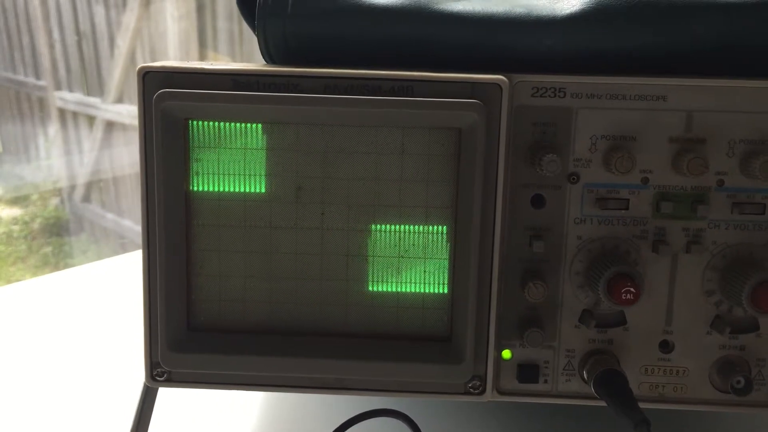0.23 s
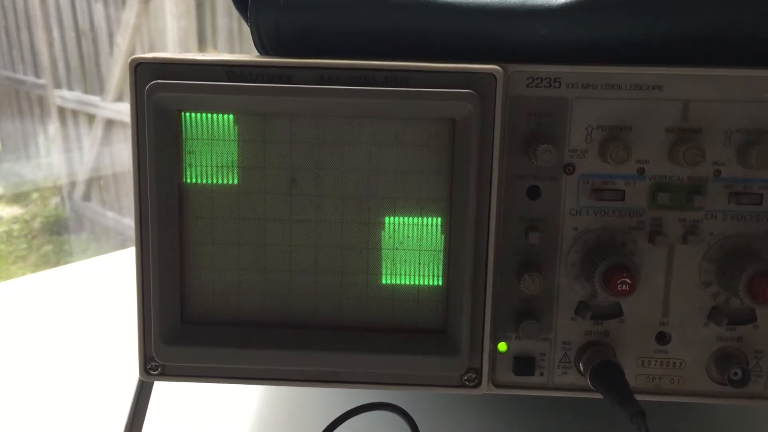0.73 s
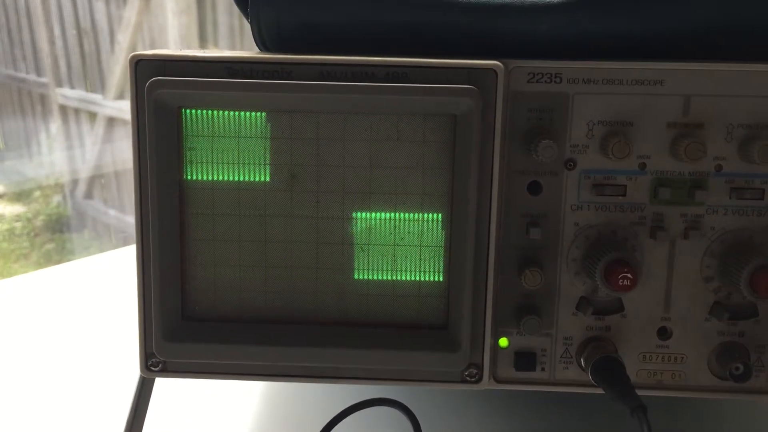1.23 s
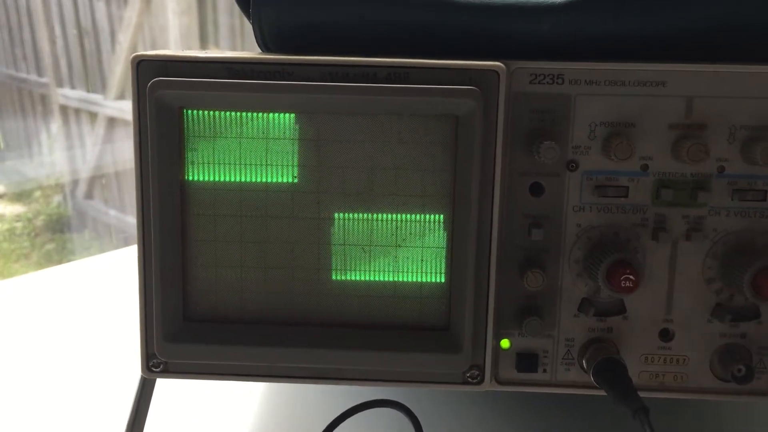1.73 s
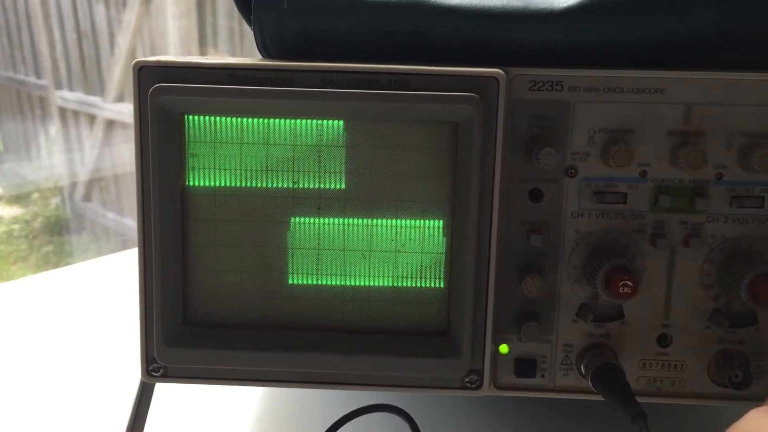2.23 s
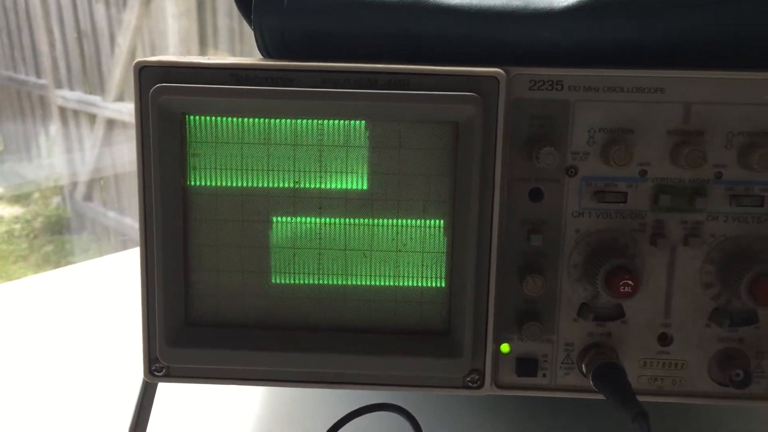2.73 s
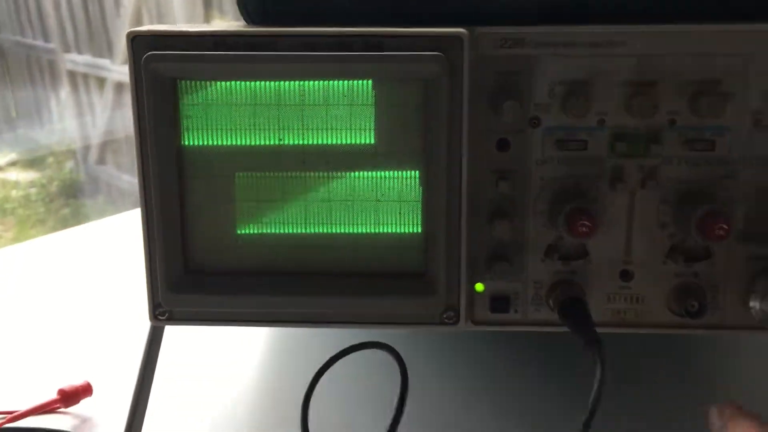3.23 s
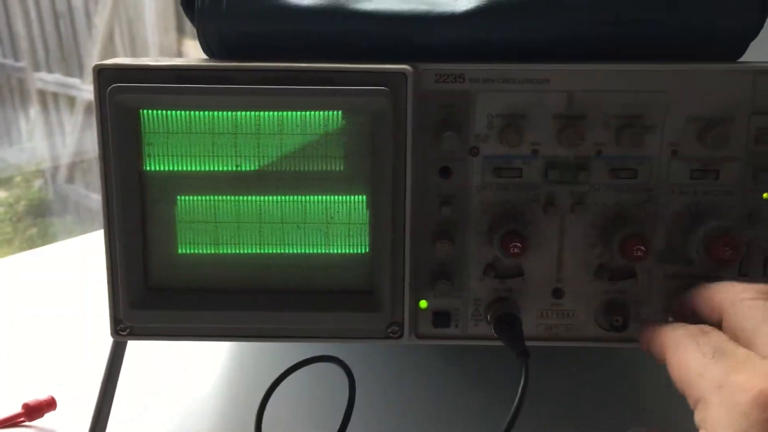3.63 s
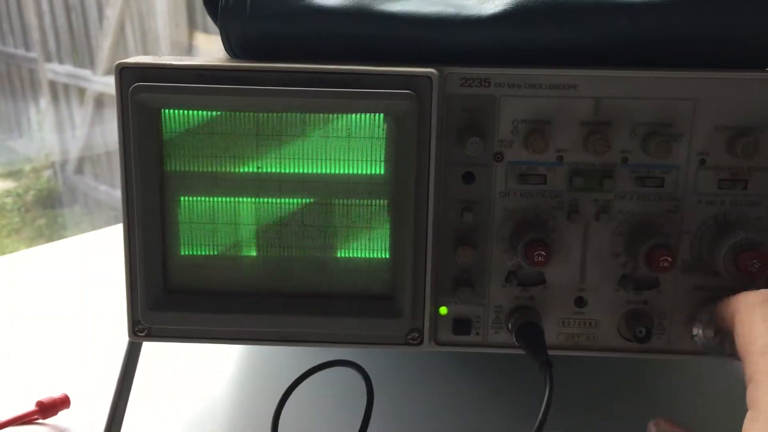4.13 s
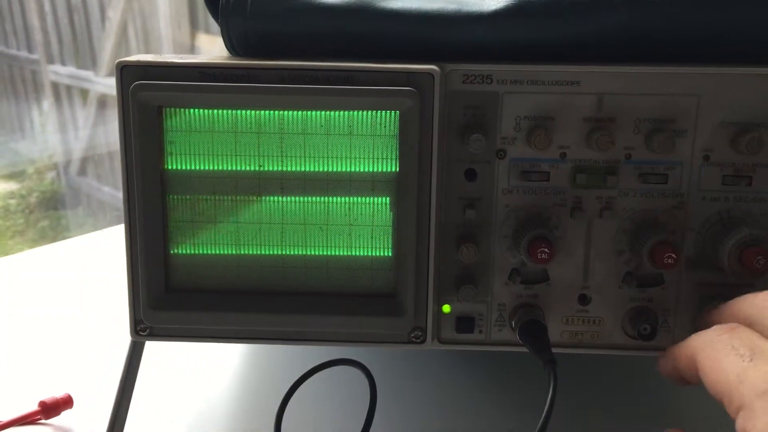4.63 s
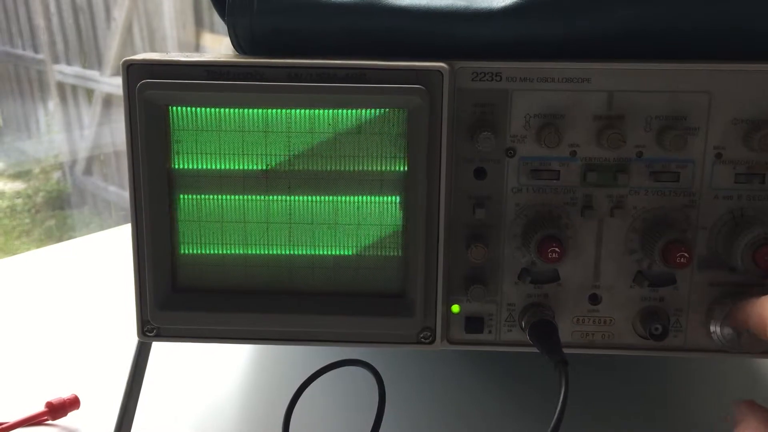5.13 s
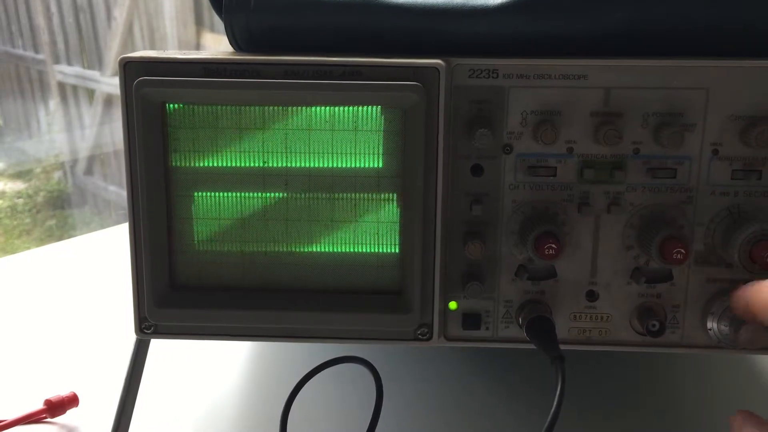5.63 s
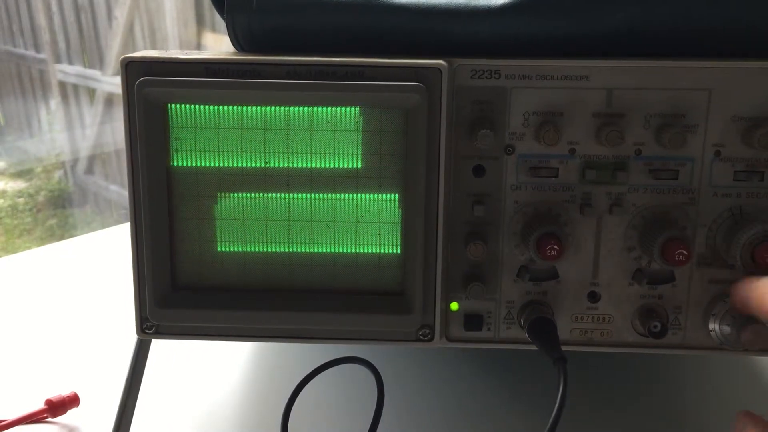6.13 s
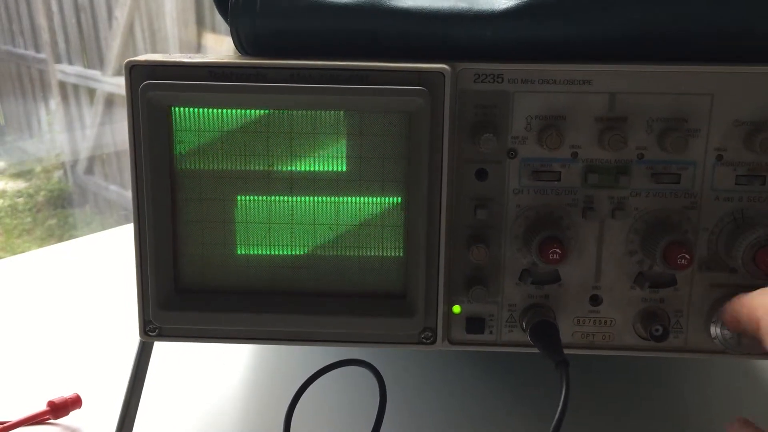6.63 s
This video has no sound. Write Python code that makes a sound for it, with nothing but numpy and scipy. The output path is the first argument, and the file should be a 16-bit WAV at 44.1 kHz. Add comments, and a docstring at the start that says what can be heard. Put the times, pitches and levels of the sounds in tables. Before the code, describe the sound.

In a quiet room with a faint, wavering low hum, the rotary switches of a bench instrument are clicked round close by. The sharp, slightly metallic clicks come in quick irregular groups, with light finger friction and faint shaft squeaks. Soft rustling swells and fades a little further away around the middle, then more clicks follow, along with a couple of soft knocks on the case.

```python
"""A low wavering hum and the floor of a quiet room; close by, a bench instrument's knobs click round.
Each step is a short chatter of the detent spring that rings the metal panel; fingers rub the knob
between steps. A small metal part pings on some clicks and the shaft squeaks faintly.
Later a duller rustle comes in strokes from further off; near the end a knuckle knocks the case."""
import sys
import numpy as np
from scipy import signal
from scipy.io import wavfile
from scipy.ndimage import uniform_filter1d

SR = 44100
rng = np.random.default_rng(int(sys.argv[2]) if len(sys.argv) > 2 else 0)


def wav_out(sig):
    """Save sig, one row per channel (or a flat mono array), as 16-bit PCM at SR to the path in sys.argv[1]."""
    wavfile.write(sys.argv[1], SR, np.round(np.clip(np.atleast_2d(sig).T, -1, 1) * 32767).astype(np.int16))


N = 303315


def gain_of(db):
    """Decibels to amplitude."""
    return 10 ** (np.asarray(db) / 20)


def unit_rms(x):
    """Scales to rms 1."""
    return x / np.sqrt(np.mean(x ** 2) + 1e-20)


def value_at(points, hz):
    """Interpolates (Hz, value) rows on a log-frequency axis."""
    points_hz, values = np.transpose(points)
    return np.interp(np.log(hz + 1), np.log(points_hz + 1), values)


def resonate(x, hz, width_hz):
    """One resonance; a low-pass at 0 Hz."""
    r = np.exp(-np.pi * width_hz / SR)
    return 2 * signal.lfilter([1 - r], [1, -r * np.exp(2j * np.pi * hz / SR)], x).real


def narrow_noise(hz, width_hz):
    """Noise through the same resonance twice, rms 1."""
    return unit_rms(resonate(resonate(rng.standard_normal(N), hz, width_hz), hz, width_hz))


def minimum_phase(points, size=2048):
    """Taps of a (Hz, dB) spectrum, energy 1."""
    db = np.maximum(value_at(points, abs(np.fft.fftfreq(size, 1 / SR))), -100)
    spectrum = np.exp(np.conj(signal.hilbert(np.log(gain_of(db)))))
    taps = np.fft.ifft(spectrum).real[:size // 2]
    return taps / np.linalg.norm(taps)


def patchy_noise(points, patch_db, size, tilt_db_per_oct=0):
    """Noise of a (Hz, dB) spectrum with drifting louder and softer patches, rms 1."""
    hop, hz = size // 4, np.fft.rfftfreq(size, 1 / SR)[:, None]
    real, imag, patches = rng.standard_normal((N // hop + 5, len(hz), 3)).T
    patches = unit_rms(uniform_filter1d(uniform_filter1d(patches, size=6, axis=0), size=8, axis=1))
    db = value_at(points, hz) + tilt_db_per_oct * np.log2((hz + 50) / 1500) + patch_db * patches
    spectra = (real + 1j * imag) * gain_of(db)
    return unit_rms(signal.istft(spectra, nperseg=size, noverlap=size - hop)[1][:N])


def grit(spread_db, hold_samples):
    """Uneven friction: a random gain for each brief slip, rms 1."""
    slips_db = spread_db * np.minimum(rng.exponential(1, N // hold_samples + 1), 5)
    return unit_rms(gain_of(slips_db).repeat(hold_samples))[:N]


def hum():
    """A wavering low tone and two fuzzier lines above it."""
    # Each row: time in seconds, level of the low tone in dB.
    tone_levels = [(0.0, -58), (0.11, -53), (0.25, -74), (0.32, -58), (1.09, -51.5), (2.14, -48.5),
                   (2.79, -55.5), (2.85, -64), (4.3, -54.5), (4.38, -62.5), (4.53, -49.5), (4.61, -55),
                   (4.78, -49.5), (4.88, -65), (5.01, -49), (5.2, -68), (5.24, -57.5), (5.64, -65),
                   (5.8, -54), (5.87, -66), (6.35, -56.5), (6.87, -53)]
    # Each row: pitch in Hz, width in Hz, level in dB.
    upper_lines = [(123.9, 10.9, -64.5), (145.3, 8.7, -60)]
    tone_hz, drift_hz, waver_db = 59.2, 0.74, 2
    t = np.arange(N) / SR
    drift = unit_rms(resonate(rng.standard_normal(N), 0, width_hz=6.2))
    tone = np.sqrt(2) * np.sin(2 * np.pi * np.cumsum(tone_hz + drift_hz * drift) / SR)
    waver = narrow_noise(0, width_hz=4.3)
    out = tone * gain_of(np.interp(t, *np.transpose(tone_levels)) + waver_db * waver)
    for hz, width_hz, db in upper_lines:
        out += gain_of(db) * unit_rms(narrow_noise(hz, width_hz) + 4.3 * np.sin(2 * np.pi * hz * t))
    return out


def noise_floor():
    """Rumble and faint hiss of the room and the microphone."""
    # Each row: frequency in Hz, relative density in dB.
    spectrum = [(15, -31.5), (25, -20), (40, -18.5), (59, -5), (102, -8), (149, -8), (223, -13.5),
                (293, -14.5), (463, -34.5), (695, -30), (988, -39.5), (1370, -36.5), (4870, -44.5),
                (12500, -51), (14800, -52.5), (16000, -79)]
    return gain_of(-57) * patchy_noise(spectrum, patch_db=1.6, size=2048)


def detent_force(grips):
    """Dying chatter of the spring at each step, as envelopes by grip and band."""
    # Each row: start in seconds, drive in dB, thud and snap offsets in dB, chatter t60 in seconds.
    clicks = [(0.1299, -38.5, -13, 3.5, .049), (0.144, -35, -3, -1, .018), (0.157, -25, -2.5, -0.5, .036),
              (0.174, -26, 4.5, -3, .03), (.1864, -18.5, -0.5, 6.5, .025), (0.1946, -25, 8, -2, .018),
              (0.275, -27, -25.5, 3, .017), (0.2992, -32.5, -1, 2.5, .028), (0.5286, -40, -3, 5, .041),
              (.58, -15.5, 1.5, 6, .023), (0.5913, -12.5, 0, 0.5, .014), (.602, -9.5, 3, 1.5, .021),
              (0.6586, -31, -7, 2.5, .022), (1.121, -21.5, -2.5, 2, .043), (1.139, -38, -9, 17.5, .017),
              (1.1506, -15.5, 6.5, 6.5, .016), (1.155, -28.5, -19, -1.5, .01), (1.273, -38.5, -19, 9, .022),
              (1.3113, -44, -20.5, 8.5, .031), (1.3298, -14.5, -7, 4.5, .026),
              (1.3367, -15, -0.5, -15, .016), (1.3461, -20.5, 8, -4.5, .026),
              (1.3553, -13.5, -3.5, 1.5, .029), (1.4693, -20, -5, 1.5, .026), (1.8005, -32, -2.5, 4, .06),
              (1.909, -26.5, 1.5, 5, .034), (1.933, -25, 10, 1.5, .021), (1.946, -10.5, -1.5, 1.5, .024),
              (2.0294, -31, -10, 6, .02), (2.1202, -30, -3, 4, .025), (2.135, -30.5, -6, 9.5, .027),
              (2.156, -29.5, 13, 5, .021), (2.18, -28.5, 5, 0, .028), (2.2002, -33, 5, 8.5, .045),
              (2.2175, -23, 4.5, -7, .024), (2.258, -14.5, -5.5, 2.5, .02), (2.598, -32, -4, 3.5, .031),
              (2.6401, -20, -3.5, 4, .018), (2.7257, -26.5, -3, -5, .037), (2.7485, -26, -5, -0.5, .058),
              (2.763, -11, 3.5, -2, .013), (2.824, -31.5, -20, 5.5, .027), (2.93, -31, 0.5, 1, .027),
              (2.9557, -39.5, 13, 15, .02), (2.976, -32.5, 4, 7, .029), (3.003, -35, -8, 1, .043),
              (3.023, -24, -5, 8, .02), (3.085, -17, -0.5, 3.5, .018), (3.476, -34.5, -17, 1, .02),
              (3.6432, -21.5, -13, 5, .025), (3.6698, -23.5, -12, 4, .022), (3.684, -18.5, -19.5, 2, .013),
              (3.756, -26, -20, 6, .017), (3.7736, -26.5, -20.5, 4.5, .017), (3.868, -19.5, 2.5, -1, .069),
              (3.882, -15, -4, 5, .032), (3.8943, -16.5, 5.5, -8.5, .016), (4.386, -34, 3, 3, .025),
              (4.4838, -27.5, 2, 2, 0.036), (5.0691, -44, -4, -2, .017), (5.23, -50, 3, 7, .033),
              (5.2525, -43, -2, 5.5, .035), (5.266, -42, 6, 2, .019), (5.417, -24.5, -1.5, 4.5, .052),
              (5.435, -36.5, 2, 12.5, .048), (5.46, -23, -1, 0, .026), (5.5091, -23, 2.5, 6, .023),
              (5.833, -43, 0, 4, .052), (5.8545, -47, 18.5, 2, 0.016), (5.903, -46, 8, 15, .02),
              (5.9662, -27, 0.5, 4, .059), (5.9834, -18, 1.5, -2, .026), (5.9954, -18, 1, 3, .02),
              (6.0285, -27, 1, 3, .02), (6.284, -31, -5, 0.5, 0.026), (6.2869, -25, 12, -16, .016),
              (6.333, -36.5, -9, 4, .022), (6.497, -19.5, -0.5, 4, .029), (6.517, -21, 2, 5, 0.016),
              (6.8724, -39, -19, -1.5, .038)]
    rise_s = 0.0022
    force, t = np.zeros((grips, 4, N + 4000)), np.arange(4000) / SR
    for grip, (start_s, db, thud_db, snap_db, t60_s) in zip(rng.integers(0, grips, len(clicks)), clicks):
        chatter = gain_of(-60 * t / t60_s) * np.minimum(t / rise_s, 1)
        at, top_db = round(start_s * SR), 0.5 + 0.19 * snap_db
        colour = gain_of([[thud_db], [0], [snap_db], [top_db]])
        force[grip, :, at:at + len(t)] += gain_of(db) * colour * chatter
    return force[..., :N]


def finger_force(grips):
    """Fingers rub the knob in slips of about 1 ms, as envelopes by grip and band."""
    # Each row: start and length in seconds, first and last drive in dB, snap offset in dB.
    rubs = [(.13, 0.16, -44.5, -49, -2), (.53, 0.21, -49.5, -60.5, -0.5), (.98, 0.18, -70.5, -48, 3.5),
            (1.13, 0.26, -44, -58.5, -1), (1.3, 0.18, -55, -42.5, 1.5), (1.83, 0.13, -65, -36, -3),
            (2.03, 0.12, -53.5, -55, 3), (2.12, 0.15, -45, -44, -2), (2.6, 0.076, -46, -60, 7),
            (2.72, 0.22, -46, -52.5, 4), (2.93, 0.16, -53, -38.5, -3.5), (3.59, 0.15, -50, -38, 1.5),
            (3.76, .12, -34, -34.5, -3.5), (3.9, .1, -42.5, -42, -8), (4.3, 0.16, -64, -49, 7),
            (4.45, 0.14, -42, -55, -10), (5.08, 0.19, -71.5, -54, 1), (5.3, 0.125, -75, -47, 3),
            (5.42, 0.1, -34.5, -48, -3), (5.84, 0.13, -64, -40.5, -0.5), (5.97, .1, -40, -50, 0.5),
            (6.07, 0.18, -43.5, -53, 0), (6.26, 0.34, -60, -54, 1.5)]
    rise_s, fall_s, thud_db = 0.0081, 0.033, 1.5
    force, slips = np.zeros((grips, 4, N)), grit(spread_db=1.8, hold_samples=40)
    for k, (start_s, length_s, first_db, last_db, snap_db) in enumerate(rubs):
        t, at = np.arange(0, length_s, 1 / SR), round(start_s * SR)
        fade = np.minimum(np.minimum(t / rise_s, (length_s - t) / fall_s), 1)
        stroke = gain_of(first_db + (last_db - first_db) * t / length_s) * fade
        colour = gain_of([[thud_db], [0], [snap_db], [snap_db - 6]])
        force[k % grips, :, at:at + len(t)] += colour * stroke * slips[at:at + len(t)]
    return force


def knobs(grips=5):
    """The noisy force cracks directly and rings the panel; each grip detunes and reweights the modes."""
    # Panel and shaft modes. Each row: frequency in Hz, relative level in dB, t60 in seconds.
    modes = [(260, -14, .15), (400, -21, .08), (759, -9, .045), (900, -11, .035), (1350, -8, .03),
             (1630, -9, .04), (1990, -9, .03), (2230, -9, .035), (2450, 0, .04), (2560, -1, .03),
             (3780, -9, .015), (4150, -11, .012), (5580, -10, .012), (6430, -7, .018), (6910, -9, .015),
             (7900, -9, .015), (8390, -6, .018), (9570, -14, .015), (14000, -17, .02)]
    # Unringing part of a click. Each row: frequency in Hz, relative density in dB.
    crack = [(180, -41.5), (300, -26), (486, -19.5), (870, 1), (1150, -10), (2480, 4.5), (4830, -7.5),
             (7000, -3), (9000, -5), (10800, -17), (13500, -13.5), (15200, -16.5), (16000, -75)]
    # Edges in Hz between the thud, middle, snap and top bands.
    edges_hz = [1700, 5500, 11500]
    grip_detune, grip_spread_db, bass_cut_hz = 0.01, 3, 235  # the light knob pushes no deeper bass
    low, mid, top = edges_hz
    bands = [signal.butter(3, hz, kind, fs=SR, output="sos")
             for hz, kind in ((low, "low"), ([low, mid], "band"), ([mid, top], "band"), (top, "high"))]
    noise, t, out = rng.standard_normal(N), np.arange(8000) / SR, np.zeros(N)
    for envelopes in detent_force(grips) + finger_force(grips):
        force = sum(signal.sosfilt(band, envelope * noise) for band, envelope in zip(bands, envelopes))
        ring = np.zeros(len(t))
        for hz, db, t60_s in modes:
            level_shift, pitch_shift = rng.standard_normal(2)
            decay = gain_of(db + grip_spread_db * level_shift - 60 * t / t60_s)
            ring += decay * np.sin(2 * np.pi * hz * (1 + grip_detune * pitch_shift) * t)
        body = gain_of(-11) * ring / np.linalg.norm(ring)
        body[:1024] += gain_of(-5.5) * minimum_phase(crack)
        out += signal.oaconvolve(force, body)[:N]
    return signal.sosfilt(signal.butter(4, bass_cut_hz, "high", fs=SR, output="sos"), out)


def pings():
    """A small metal part of the switch rings briefly, at a slightly different pitch each time."""
    # Each row: start in seconds, level in dB.
    strikes = [(.187, -41), (1.155, -34), (1.34, -41), (1.911, -41), (1.947, -44), (2.749, -35),
               (3.026, -42), (3.669, -46), (3.882, -39), (5.434, -43), (5.462, -37), (6.518, -34)]
    pitch_hz, detune, t60_s = 13900, 0.004, 0.058
    out, t = np.zeros(N + 8000), np.arange(8000) / SR
    for start_s, db in strikes:
        hz = pitch_hz * (1 + detune * rng.standard_normal())
        out[round(start_s * SR):][:len(t)] += gain_of(db - 60 * t / t60_s) * np.sin(2 * np.pi * hz * t)
    return out[:N]


def glide(x, hz, width_hz):
    """A double resonance that follows the curve hz; output rms 1."""
    turn, r = np.exp(2j * np.pi * np.cumsum(hz) / SR), np.exp(-np.pi * width_hz / SR)
    return unit_rms((turn * signal.lfilter([1], np.poly([r, r]), x / turn)).real)


def squeaks():
    """The turning shaft gives fuzzy gliding whistles with one overtone; the highest are purer."""
    # Each row: start and end in seconds, first and last pitch in Hz, width in Hz, level in dB,
    # overtone offset in dB.
    glides = [(1.04, 1.088, 1250, 1500, 140, -68, -8), (1.08, 1.12, 1500, 2350, 200, -68, -4),
              (6.09, 6.26, 11160, 11110, 40, -68, -40), (6.12, 6.28, 9060, 9060, 60, -70, -40),
              (6.38, 6.44, 2200, 2750, 90, -63, -20), (6.432, 6.49, 2750, 2500, 80, -62, -20),
              (5.13, 5.21, 7200, 6800, 400, -72, -40), (.99, 1.11, 7700, 8100, 400, -66, -40),
              (1.2, 1.25, 7300, 6900, 300, -65, -40), (6.42, 6.47, 7600, 8200, 400, -66, -40),
              (2.05, 2.12, 8600, 7200, 400, -64, -40)]
    pure_above_hz, pure_share = 9000, 0.6
    out, noise = np.zeros(N), rng.standard_normal(N)
    for start_s, end_s, first_hz, last_hz, width_hz, db, overtone_db in glides:
        span = slice(round(start_s * SR), round(end_s * SR))
        hz = np.linspace(first_hz, last_hz, span.stop - span.start)
        whistle = glide(noise[span], hz, width_hz)
        whistle += gain_of(overtone_db) * glide(noise[span], 2 * hz, width_hz)
        if first_hz > pure_above_hz:
            tone = np.sqrt(2) * np.sin(2 * np.pi * np.cumsum(hz) / SR)
            whistle = (1 - pure_share) * whistle + pure_share * tone
        out[span] += gain_of(db) * whistle * signal.windows.tukey(len(hz), 0.3)
    return out


def rustle():
    """Strokes of dull and bright grainy noise; each sets in softly with a hollow note and fades."""
    # Each row: start in seconds, relative level in dB, rise and t60 in seconds,
    # brightness (-4 or less is all dull, 4 or more all bright).
    strokes = [(2.683, -57.5, 0.0063, 0.47, 4.5), (2.95, -56.5, 0.017, 1, -0.5),
               (3.099, -61, 0.0059, 0.33, -1.5), (3.22, -52.5, 0.034, 0.43, -2.5),
               (3.366, -54.5, 0.02, 0.51, -1), (3.569, -49, 0.1, 0.84, 2.5), (3.76, -51.5, 0.091, 1, 9),
               (3.959, -52.5, 0.021, 0.25, 2.5), (4.12, -43.5, 0.043, 0.46, 8.5),
               (4.288, -47.5, 0.039, 0.41, 2), (4.36, -54, 0.042, 0.15, -9), (4.45, -45, 0.043, 0.49, 2),
               (4.62, -50.5, 0.036, 0.39, -3), (4.71, -60.5, 0.024, 0.25, -5),
               (6.085, -56, 0.038, 0.37, -5), (6.809, -67.5, 0.0021, 0.17, 6.5)]
    # Each row: frequency in Hz, relative density in dB.
    spectrum = [(120, -22.5), (200, 6), (316, -3.5), (440, -4), (659, 4.5), (1160, -7.5), (1270, -11.5),
                (1740, -3.5), (2650, -12), (4520, -19.5), (8120, -31.5), (14900, -59.5), (16000, -60)]
    # Stronger bands. Each row: centre in Hz, width in Hz, gain in dB.
    bands = [(1383, 160, 11.5), (1706, 350, -10)]
    note_hz, note_width_hz, note_db, note_t60_s = 675, 50, 10, 0.16
    dull = patchy_noise(spectrum, patch_db=2.2, size=512, tilt_db_per_oct=-4)
    bright = patchy_noise(spectrum, patch_db=2.2, size=512, tilt_db_per_oct=4)
    bright *= grit(spread_db=1, hold_samples=90)
    out, note_drive, t = np.zeros(N), np.zeros(N), np.arange(N) / SR
    for start_s, db, rise_s, t60_s, brightness in strokes:
        age_s = np.maximum(t - start_s, 0)
        onset = 1 - np.exp(-age_s / rise_s)
        share = np.clip(0.5 + brightness / 8, 0, 1)
        blend = np.sqrt(1 - share) * dull + np.sqrt(share) * bright
        out += gain_of(db - 60 * age_s / t60_s) * onset * blend
        note_drive += gain_of(db + note_db - 60 * age_s / note_t60_s) * onset * dull
    resonances = sum(gain_of(db) * resonate(out, hz, width_hz) for hz, width_hz, db in bands)
    return out + resonances + resonate(note_drive, note_hz, note_width_hz)


def knocks():
    """Soft knuckle blows ring the hollow modes of the case, with new phases each time."""
    # Each row: start in seconds, level in dB.
    blows = [(5.998, -35.5), (6.288, -36), (6.292, -41), (6.304, -43), (6.812, -56), (6.826, -54.5)]
    # Each row: frequency in Hz, relative level in dB, t60 in seconds.
    modes = [(409, -16, .1), (759, -5, .09), (860, -8, .06), (964, 0, .08), (1330, -6, .07),
             (1370, -4, .09), (1523, -8, .06), (1938, -10, .06), (2200, -4, .03)]
    rise_s = 0.00046
    out, t = np.zeros(N + 8000), np.arange(8000) / SR
    for start_s, db in blows:
        ring = sum(gain_of(mode_db - 60 * t / t60_s) * np.sin(2 * np.pi * (hz * t + rng.random()))
                   for hz, mode_db, t60_s in modes)
        out[round(start_s * SR):][:len(t)] += gain_of(db) * ring * np.minimum(t / rise_s, 1)
    return out[:N]


def room(x, tail_count=3):
    """Sparse reflections, treble dying first; three tails crossfade slowly so no pitch keeps ringing."""
    # Each row: frequency in Hz, t60 in seconds.
    decay_times = [(200, 0.33), (1000, 0.25), (4000, 0.18), (14000, 0.13)]
    crossfade_hz = 1.3
    taps, slots = np.zeros((tail_count, SR // 2)), np.arange(200, SR // 2 - 20, 20)
    arrivals = slots + rng.integers(0, 20, (tail_count, len(slots)))
    np.put_along_axis(taps, arrivals, rng.choice([-1., 1.], arrivals.shape), 1)
    hz, t, spectra = signal.stft(taps, SR, nperseg=256)
    decay = gain_of(-60 * t / value_at(decay_times, hz)[:, None])
    tails = signal.istft(spectra * decay, SR, nperseg=256)[1]
    cycles = crossfade_hz * np.arange(N) / SR + np.arange(tail_count)[:, None] / tail_count
    shares = np.sqrt(2 / tail_count) * np.sin(np.pi * cycles)
    return sum(signal.oaconvolve(x * share, tail / np.linalg.norm(tail))[:N]
               for share, tail in zip(shares, tails))


def scene():
    """Near knobs and far rustle, both with a little room, over hum and floor."""
    near = knobs() + squeaks() + knocks() + pings()
    far = rustle()
    reflections = room(gain_of(-6) * near + gain_of(-4) * far)
    return (near + gain_of(9) * far + reflections + hum() + noise_floor())[None]


def record(dry):
    """The microphone drops the lowest rumble; then the band limit."""
    rumble_cut_hz, band_limit_hz = 44, 15400
    thinned = signal.sosfilt(signal.butter(6, rumble_cut_hz, "high", fs=SR, output="sos"), dry)
    lowpass = signal.firwin(255, band_limit_hz, window=("kaiser", 9), fs=SR)
    return signal.oaconvolve(thinned, lowpass[None], "same")


dry = scene()
out = record(dry)
wav_out(out)
```